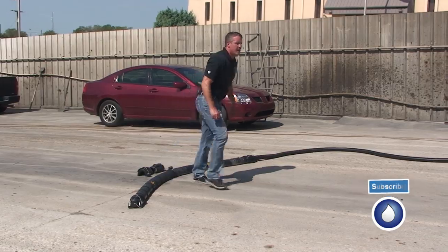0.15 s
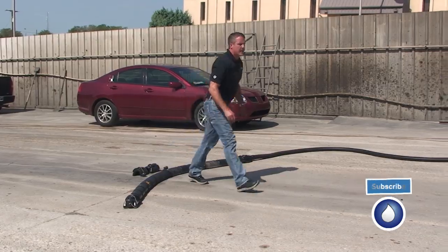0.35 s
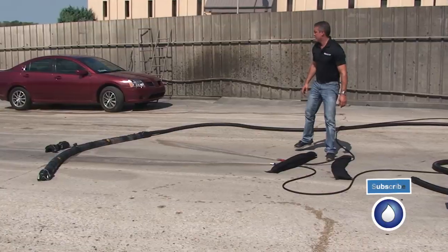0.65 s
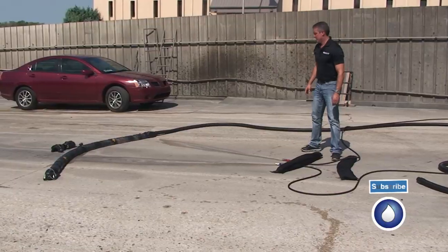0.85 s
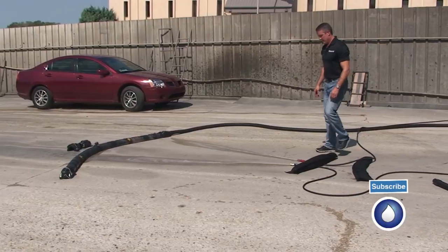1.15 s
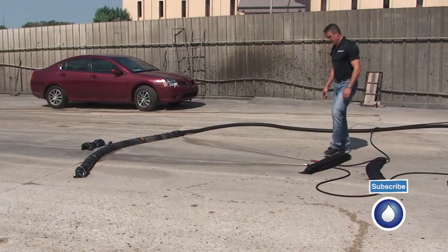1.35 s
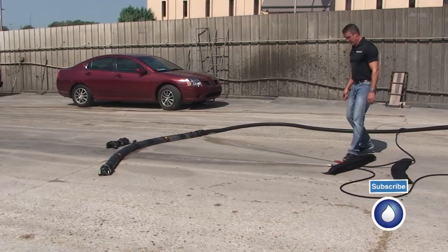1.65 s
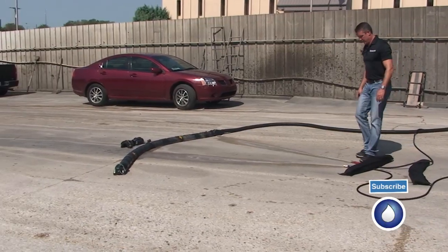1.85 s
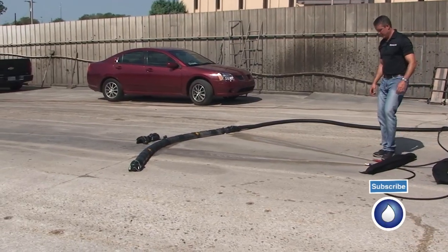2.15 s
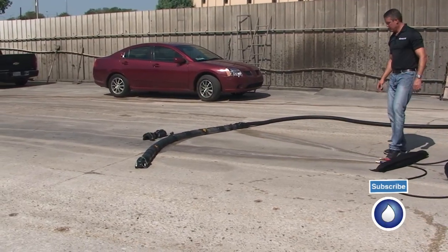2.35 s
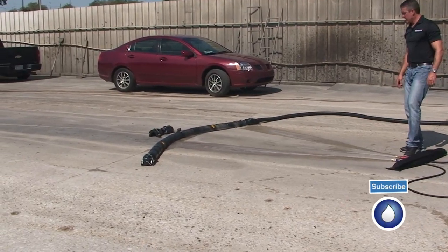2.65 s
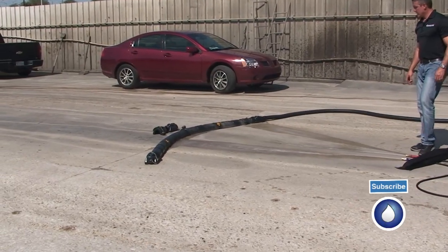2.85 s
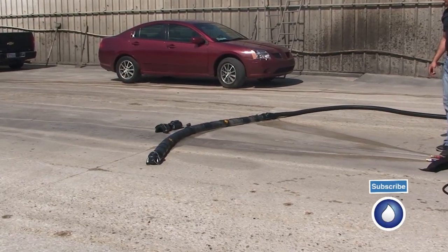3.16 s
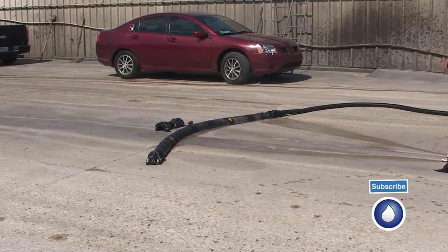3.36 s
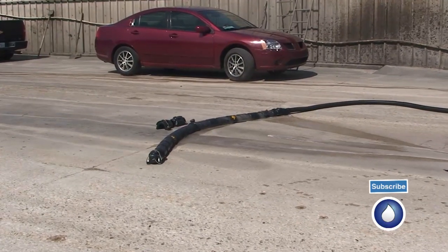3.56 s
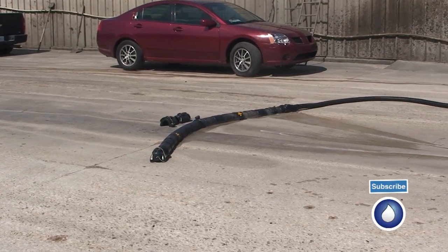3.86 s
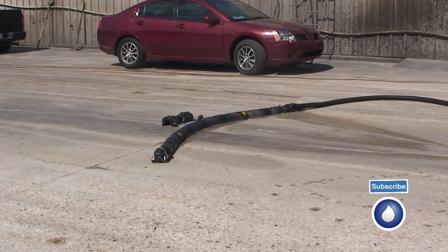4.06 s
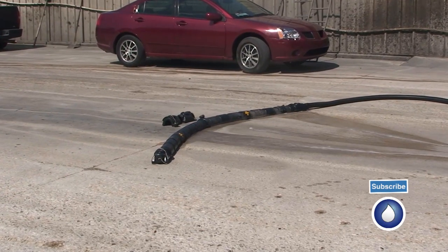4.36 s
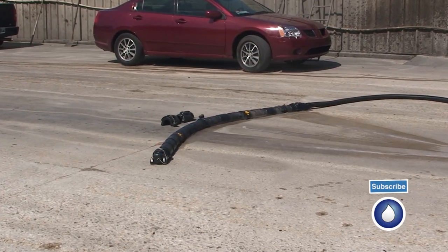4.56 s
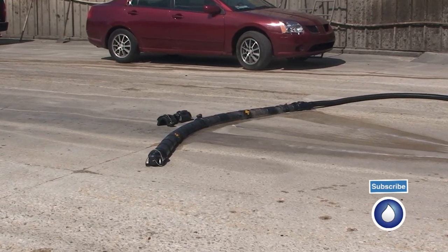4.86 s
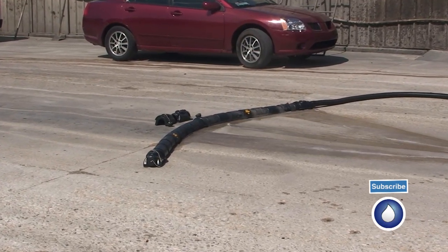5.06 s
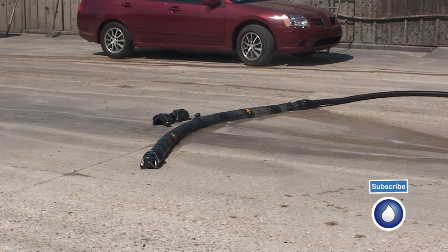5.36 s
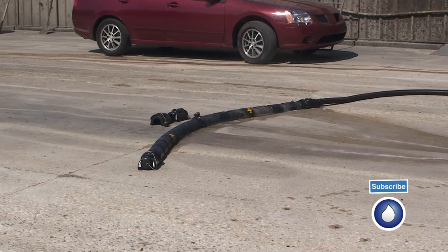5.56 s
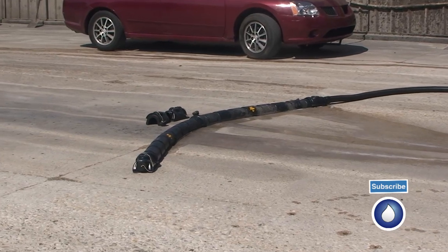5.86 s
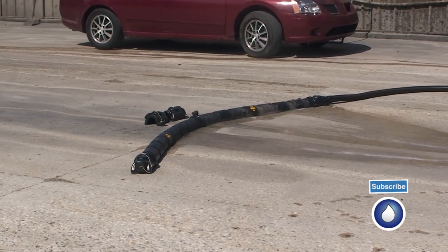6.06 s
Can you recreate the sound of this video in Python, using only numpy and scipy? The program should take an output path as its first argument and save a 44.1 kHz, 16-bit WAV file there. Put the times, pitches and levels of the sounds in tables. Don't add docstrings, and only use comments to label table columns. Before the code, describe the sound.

Brief quiet yard murmur with a faint distant motor hum, then an abrupt cut to a loud droning blower, rushing air and spitting water spray.

```python
import sys
import numpy as np
from scipy import signal
from scipy.fft import rfft, irfft
from scipy.io import wavfile
from scipy.ndimage import map_coordinates

SR = 44100
rng = np.random.default_rng(int(sys.argv[2]) if len(sys.argv) > 2 else 0)


def wrap_up_sound(samples):
    columns = np.atleast_2d(samples).T
    tamed = np.clip(columns, -1, 1)
    steps = np.round(tamed * 32767).astype(np.int16)
    wavfile.write(sys.argv[1], SR, steps)


def invert_db(x):
    u = np.asarray(x, float) / 20
    return 10 ** u


N = 274280

CUT_S = .4549
BELT_RATIO = 1.0125

# [t/s, f/Hz]
LOBE_SPEED = [(.455, 228.95), (.75, 228.75), (1, 228.31), (1.45, 229.2), (1.75, 228.86), (2.25, 229.12),
              (2.5, 228.6), (2.75, 228.6), (3.25, 227.83), (3.75, 228.34), (4, 229.01), (4.25, 229.02),
              (4.5, 228.17), (5, 227.28), (5.25, 226.24), (5.5, 226.05), (6, 226.37), (6.22, 226.38)]
# [t/s, first lobe order level/dB, second order level/dB]
DRONE = [(.47, -18, -19.5), (.6, -18, -19.5), (.84, -21, -22), (1.05, -22.2, -20.7), (1.22, -20.5, -20),
         (1.5, -22, -19), (1.72, -21.8, -18.7), (2, -20.5, -19), (2.47, -20.7, -19), (2.97, -19.8, -18.5),
         (3.55, -20.5, -18.6), (3.84, -20.2, -19.8), (4.34, -19.7, -20.3), (4.5, -20.2, -19),
         (5, -20.3, -18.2), (5.5, -20.5, -17.7), (6.22, -20.1, -18.4)]
# [level/dB, share of flank, share of end, settling rise/dB]
SHELL = [(-48, 0, 0, 14), (-35, .95, 0, 0), (-37, 0, 1, 0), (-36.3, 1.2, 0, 0)]
# [t/s, flank level/dB, end level/dB]
PANNING = [(.47, 3.5, -1.5), (.65, 4, -1.5), (.95, -1.2, -4), (1.12, -.3, 0), (1.33, 1.5, -7.5),
           (1.55, 2.5, -5), (1.91, 4.5, -6), (2.23, 3, 2), (2.55, -1.5, -1), (3.05, -2.5, 2.5),
           (3.6, -3, 1.5), (3.9, -.5, 0), (4.2, 2, -1), (4.5, 2, 2), (4.79, 0, 4.5), (5.05, -3, -1.5),
           (5.45, -4, -.7), (6.22, -2, -3.5)]
# [delay/lobe passes, click, low, middle, high casing ring level/dB]
CONTACTS = [
    (-.08, 0, 0, 0, 0),
    (.22, -1, -12, -14, -14),
    (.6, -1, -9, -12, -12),
    (.95, -1, -3, -9, -7),
    (1.2, -1, -12, -14, -4),
    (1.4, -3, -14, -14, -4),
    (1.55, 0, -9, -14, -9),
]
# [f/Hz, level/dB, t60/s]
CASING = [
    [(7560, 3, .03), (8080, -3, .03), (8330, -3, .04), (9060, 1, .03), (9390, 1, .03), (9750, 0, .02),
     (10300, -3, .03), (12050, -6, .03), (12800, -5, .02), (13500, -7, .03)],
    [(4770, -3, .018), (4980, -3, .015), (5160, 0, .018), (5440, -9, .02)],
    [(5920, -5, .014), (6130, 0, .007)],
    [(6615, 0, .035), (6790, -7, .02), (6980, -15, .03)],
]
# [low f/Hz, high f/Hz]
CASING_EDGES = [(7200, 14500), (4500, 5650), (5700, 6450), (6450, 7150)]
# [level/dB, share of loudness, of lean, of spurts, late drift/dB per s]
CASING_LEVEL = [(-43, 0.86, 0.21, 0.33, -4), (-44, 0.8, .6, .1, 1.5), (-39.5, 0.97, -0.69, 0.64, 0),
                (-42, 1, 0.95, 0.32, .3)]
# [t/s, loudness level/dB, lean from middle ring to high ring/dB]
GEAR_VIEW = [(.47, -13, -6), (.8, -5, -2), (1.15, -4, 0), (1.5, -5.5, 1), (1.8, -0.5, 2.5), (2.28, 0.5, 3),
             (2.4, -2.5, 7), (3, -0.5, 3), (3.6, 1, 1.5), (4, -1.5, 1), (4.35, -3.5, 2), (4.55, 0, -6),
             (4.78, 1, -4), (4.95, 2.5, 1.5), (5.5, 2.5, -1), (6.22, 2, 0)]
# [multiple of shaft turn, level/dB]
SHAFT = [(2, -40), (6, -42), (7, -52), (14, -52), (18, -46.5), (28, -49.5), (52, -57), (56, -57), (60, -58)]
# [multiple of half shaft speed, level/dB]
HALF_SHAFT = [(6, -50), (9, -50), (10, -49), (15, -48), (17, -50), (22, -54), (25, -53), (26, -53),
              (30, -55), (33, -55), (41, -53), (42, -55), (47, -56), (49, -54)]
# [multiple of engine cycle, level/dB]
ENGINE = [(1, -61), (2, -38), (2.5, -54), (3, -47), (5, -38.5), (6, -45), (7, -51), (13, -45), (14, -51),
          (15, -54), (16, -54), (18, -50), (19, -50), (20, -55), (23, -56), (32, -54), (39, -57), (41, -52)]
# [f/Hz, level per line/dB]
RATTLE = [(28, -30), (200, -5), (500, -3), (900, -0.5), (1400, -12), (2100, -13), (3200, -13),
          (3800, -16.5), (4500, -25)]
# [f/Hz, level per Hz/dB]
AIR = [(20, -30), (40, 0), (55, -10), (90, -2), (300, -4), (500, -2), (800, -7), (1400, -8.5),
       (1800, -22.5), (3600, -22), (4200, -18), (6000, -15), (9000, -20), (16000, -42)]
# [level/dB, share of flank, of end, of water flow, of ground echo/dB]
AIR_LEVEL = [
    (-35.5, 0.5, 0.25, .1, -1.6),
    (-39, -.1, 0.05, -0.0062, -11.5),
    (-40.5, 0.32, 0.59, 0.18, 0.9),
]
# [multiple of shaft turn, level against its hiss/dB]
HOSE_WHINE = [(32, -11.5), (36, -9.5), (40, -14.5)]
# [multiple of shaft turn, level against its hiss/dB]
THROAT_WHINE = [(48, -10)]
# [f/Hz, level per Hz/dB]
SPRAY = [(4000, -40), (6000, -0.5), (8500, 0), (9300, 2), (11000, 2.5), (13000, 0), (15000, -3.5),
         (16500, -13)]
# [t/s, level against full flow/dB]
FLOW = [(.47, -10.5), (.7, -11.5), (.9, -11), (1.2, -7.5), (1.35, -6), (1.75, 1), (2.3, 0), (2.45, -1.5),
        (2.9, 1), (3.2, -1), (3.55, -2), (4.3, -2.5), (4.45, 1.5), (4.9, 1), (5.1, 0), (5.45, 1),
        (5.55, -3), (6.22, 2)]
# [t/s, level above the flow/dB]
SPURTS = [(.47, 11), (.72, 4), (.84, 8), (1.03, 2), (1.27, 9), (1.78, 1), (1.87, 2), (1.97, 2), (2.19, 3),
          (2.27, 4.5), (2.59, 6), (2.83, 2), (3.25, 4), (3.38, 6), (3.51, 1), (3.6, 6), (3.76, 5.5),
          (3.89, 8.5), (4.035, 8), (4.17, 5), (4.27, 5.5), (4.38, 4), (4.56, 3), (4.99, 2), (5.63, 3),
          (5.72, 6)]
# [t/s, shortest echo detour/m, its change before/m per s, after/m per s, echo share 0-1]
SWEEPS = [
    (1.58, .1195, .3, .135, .38),
    (4.68, .1328, .42, .5, .6),
]
# [t/s, level/dB]
WHISTLE = [(.45, -72), (2.3, -66), (2.6, -56), (4.3, -52), (4.8, -47), (5.1, -51), (5.8, -42.5),
           (6.22, -53)]
# [f/Hz, level per Hz/dB]
YARD = [(18, -45), (30, -9), (86, -1), (184, -8.5), (554, -18), (721, -16), (1300, -24), (1700, -23),
        (2010, -26.5), (3220, -35), (14800, -43), (16000, -50)]
# [t/s, far motor hum level/dB, murmur level/dB]
YARD_LEVEL = [(0, -58, -49), (.1, -60, -49), (.16, -63, -49.5), (.22, -52, -50.5), (.3, -48, -48.5),
              (.4, -45, -51.5), (.455, -47, -53)]
# [f/Hz, width f/Hz, level/dB]
GRILLE = [(5600, 200, -4.5), (7120, 280, -4), (7600, 150, 2), (8600, 300, -3.5), (9100, 150, 2),
          (9750, 200, 2), (11350, 200, -2), (12500, 250, -2), (14200, 400, -2)]


def blower(lobes):
    t = np.arange(N) / SR
    shiver_db, shell_lag = 0.1, .095
    first_db, second_db = in_time(DRONE)
    out = invert_db(first_db + shiver_db * drift(4.2)) * np.cos(2 * np.pi * lobes)
    out += invert_db(second_db + shiver_db * drift(15)) * np.cos(4 * np.pi * lobes)
    late = lobes - shell_lag
    settling = np.exp(-((t - CUT_S) / 1.4) ** 2)
    for order, db in enumerate(following(SHELL, *in_time(PANNING), settling), 3):
        phase = 2 * np.pi * order * late + .25 * drift(1.5)
        out += invert_db(db + .55 * drift(12)) * np.cos(phase)
    out -= invert_db(-50) * np.cos(2 * np.pi * (3 * late + (t - .92) / 1.76))
    return np.sqrt(2) * out


def gear_ticks(lobes):
    scatter_db, wear_db, jitter, click_db = .9, 1.1, .003, -47
    table = np.array(CONTACTS)
    halves = np.arange(1, lobes[-1] // 2 - 1).astype(int)
    wear = rng.standard_normal((2, 4, len(table)))[:, halves % 4]
    shift = jitter * (rng.standard_normal(wear[0].shape) + 3 * wear[0])
    place = 2 * halves[:, None] + table[:, 0] + shift
    at = np.searchsorted(lobes, place)
    blow_db = scatter_db * rng.standard_normal(place.shape) + wear_db * wear[1]
    trains = np.full((4, N), 1e-18)
    for k, train in enumerate(trains):
        train[at] = invert_db(blow_db + table[:, k + 1])
    out = invert_db(click_db) * band(trains[0], 7500, 14500)
    after = np.maximum(np.arange(N) / SR - SWEEPS[-1][0] - .4, 0)
    levels = following(CASING_LEVEL, *in_time(GEAR_VIEW), spurts_db(), after)
    for train, group, edges, level_db in zip(trains, CASING, CASING_EDGES, levels):
        ringing = sum(invert_db(db) * ring(train, hz, t60) for hz, db, t60 in group)
        out += invert_db(level_db - 4.0) * band(ringing, *edges)
    return out


def shafts_and_belt(lobes):
    out = wavering_lines(lobes / 4, SHAFT, waver=0.14, waver_rad=0.25)
    out += wavering_lines(lobes / 8, HALF_SHAFT, waver=0.53, waver_rad=0.32)
    return out + rattle(lobes / 8, level_db=-42)


def engine(lobes):
    cycles = lobes / 8 * BELT_RATIO
    return wavering_lines(cycles, ENGINE, waver=.12, waver_rad=.2) + rattle(cycles, level_db=-43)


def rattle(cycles, level_db):
    hz, db = np.transpose(RATTLE)
    order_hz = 28.6 * np.arange(2049) + 1
    lines = invert_db(np.interp(np.log(order_hz), np.log(hz), db, right=-90))
    shapes = irfft(lines * (rng.standard_normal((2, 2049)) + 1j * rng.standard_normal((2, 2049))))
    place = np.arange(4096) / 4096
    first, second = (np.interp(cycles % 1, place, shape, period=1) for shape in shapes)
    blend = 0.35 * drift(1.0)
    return invert_db(level_db) * rms_one(np.cos(blend) * first + np.sin(blend) * second)


def air(lobes):
    rush_db, hose_db, throat_db = following(AIR_LEVEL, *in_time(PANNING), in_time(FLOW)[0], sweeps()[1])
    rush = invert_db(rush_db + .5 * drift(18)) * coloured(AIR)
    whine = wavering_lines(lobes / 4, HOSE_WHINE, waver=0.31, waver_rad=0.086)
    hose = invert_db(hose_db) * (whine + 0.61 * band(rng.standard_normal(N), 1480, 2590))
    pulse = 1 + 0.49 * np.cos(2 * np.pi * (lobes - .75)) + 0.13 * np.cos(np.pi * lobes)
    hiss = band(rng.standard_normal(N), 2540, 3410)
    throat = invert_db(throat_db - 5.0 + 1.3 * drift(20)) * pulse * hiss
    throat += invert_db(throat_db) * wavering_lines(lobes / 4, THROAT_WHINE, waver=0.063, waver_rad=0.07)
    return rush + hose + throat


def spray():
    lag, share = sweeps()
    level_db = -40.5 + in_time(FLOW)[0] + spurts_db()
    bright_db = -4 + 6 * share ** 2
    spit_db = 2.0 * np.clip(drift(150), -2, 2) + .4 * drift(15)
    jet = coloured(SPRAY) * invert_db(spit_db)
    top = signal.sosfilt(signal.butter(2, 11500, "high", fs=SR, output="sos"), jet)
    jet = jet + (invert_db(bright_db) - 1) * top
    echo = map_coordinates(jet, [np.arange(N) - lag], order=3, mode="nearest")
    wet = (jet + share * echo) / np.sqrt(1 + share ** 2)
    whistle = rms_one(ring(rng.standard_normal(N), 11000, 0.007))
    return invert_db(level_db) * wet + invert_db(in_time(WHISTLE)[0]) * whistle


def spurts_db():
    rise_s, fall_s = 0.023, 0.023
    choke_per_db, choke_lead_s, choke_s = -0.15, 0.035, 0.015
    s, db = np.transpose(SPURTS)
    t = np.arange(0, N / SR + .002, .001)
    since = t[:, None] - s
    swell = np.exp(-(since / np.where(since < 0, rise_s, fall_s)) ** 2)
    choke = choke_per_db * np.exp(-((since + choke_lead_s) / choke_s) ** 2)
    return np.interp(np.arange(N) / SR, t, (swell + choke) @ db)


def sweeps():
    longest_m, rest_share, reach_m = .24, .09, .125
    t = np.arange(N) / SR
    away = [np.where(t < s, before, after) * (t - s) for s, _, before, after, _ in SWEEPS]
    detour = np.min([np.hypot(row[1], m) for row, m in zip(SWEEPS, away)], axis=0)
    share = rest_share + sum(row[4] * np.exp(-(m / reach_m) ** 4) for row, m in zip(SWEEPS, away))
    return np.minimum(detour, longest_m) / 343 * SR, share


def yard():
    hum_db, murmur_db = in_time(YARD_LEVEL)
    hum = np.sqrt(2) * np.sin(2 * np.pi * 74 * np.arange(N) / SR + .5 * drift(6.6))
    return invert_db(hum_db) * hum + invert_db(murmur_db + 0.88 * drift(25)) * coloured(YARD)


def wavering_lines(turns, orders, waver, waver_rad):
    out = np.zeros(N)
    for k, db in orders:
        start, wander = rng.uniform(0, 2 * np.pi), drift(3.0)
        phase = 2 * np.pi * k * turns + start + waver_rad * wander[::-1]
        out += invert_db(db) * (1 + waver * wander) * np.sin(phase)
    return np.sqrt(2) * out


def ring(clicks, hz, t60):
    r, w = invert_db(-60 / (t60 * SR)), 2 * np.pi * hz / SR
    return signal.lfilter([0, np.sin(w)], [1, -2 * r * np.cos(w), r * r], clicks)


def coloured(spectrum):
    hz, db = np.transpose(spectrum)
    grid = np.arange(N // 2 + 1) * SR / N + 1
    gain = invert_db(np.interp(np.log(grid), np.log(hz), db))
    return rms_one(irfft(rfft(rng.standard_normal(N)) * gain, N))


def band(x, low_hz, high_hz):
    return rms_one(signal.sosfilt(signal.butter(2, [low_hz, high_hz], "band", fs=SR, output="sos"), x))


def drift(rate):
    r = np.exp(-80 * np.pi * rate / SR)
    noise = rng.standard_normal(N // 40 + 2002)
    slow = signal.lfilter([1], [1, -2 * r, r * r], noise)[2000:]
    return np.interp(np.arange(N) / 40, np.arange(len(slow)), rms_one(slow))


def rms_one(x):
    return x / np.sqrt(np.mean(x ** 2) + 1e-20)


def in_time(rows):
    s, *columns = np.transpose(rows)
    return [np.interp(np.arange(N) / SR, s, c) for c in columns]


def following(rows, *controls):
    return [db + np.dot(shares, controls) for db, *shares in rows]


def scene():
    lobes = np.cumsum(in_time(LOBE_SPEED)[0]) / SR
    lobes = lobes - lobes[round(CUT_S * SR)] % 2 + 1.66
    machine = blower(lobes) + gear_ticks(lobes) + shafts_and_belt(lobes) + engine(lobes)
    machine += air(lobes) + spray()
    return np.where(np.arange(N) < CUT_S * SR, yard(), machine)[None]


def roll_off(x):
    return signal.sosfilt(signal.butter(12, 16840, fs=SR, output="sos"), x)


def record(dry):
    grid = np.arange(N // 2 + 1) * SR / N
    ripple_db = sum(db / (1 + (2 * (grid - hz) / width) ** 2) for hz, width, db in GRILLE)
    mix = irfft(rfft(dry) * invert_db(ripple_db) * (grid < 15720), N)
    return roll_off(mix)


dry = scene()
out = record(dry)
wrap_up_sound(out)
```